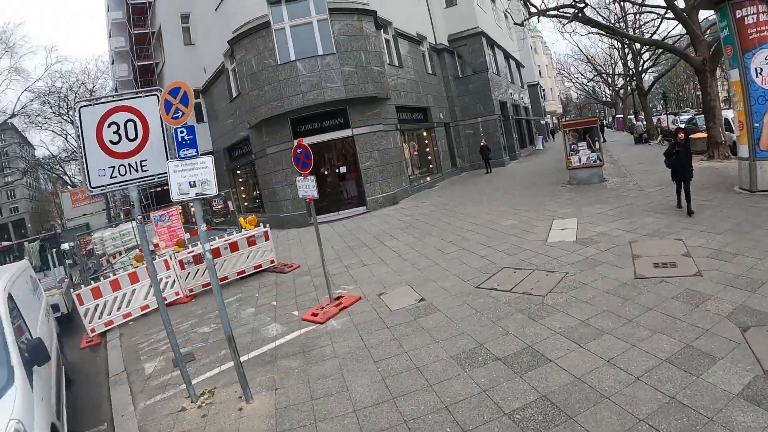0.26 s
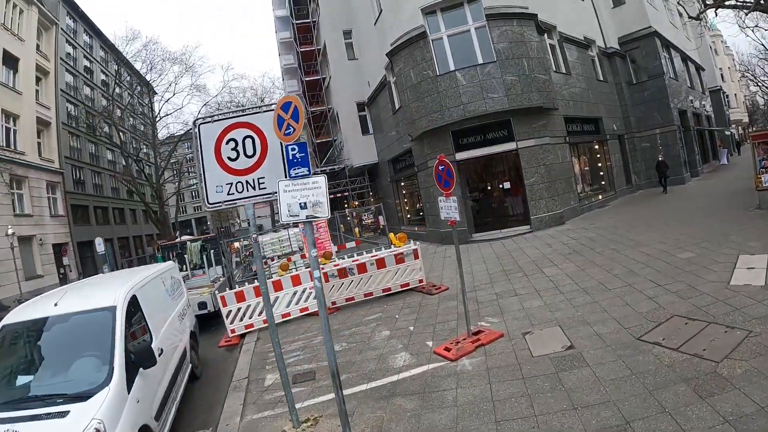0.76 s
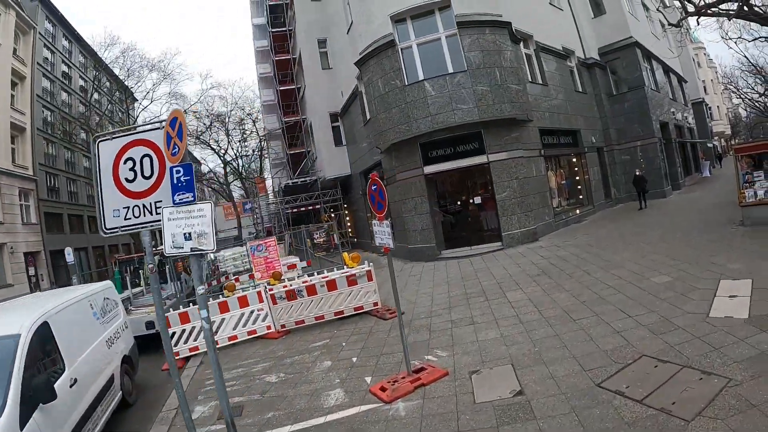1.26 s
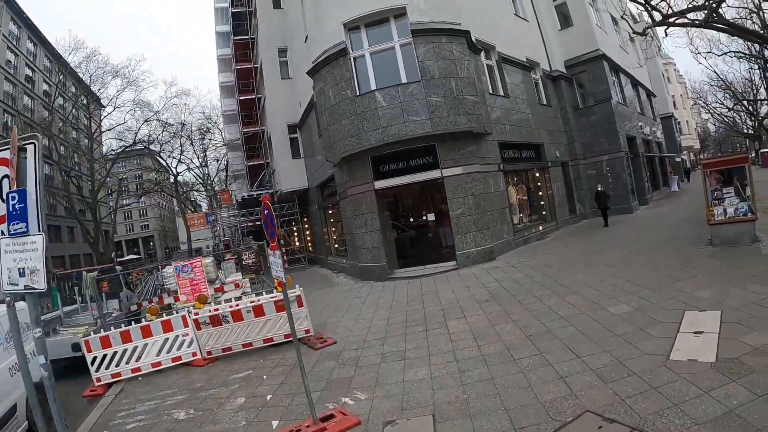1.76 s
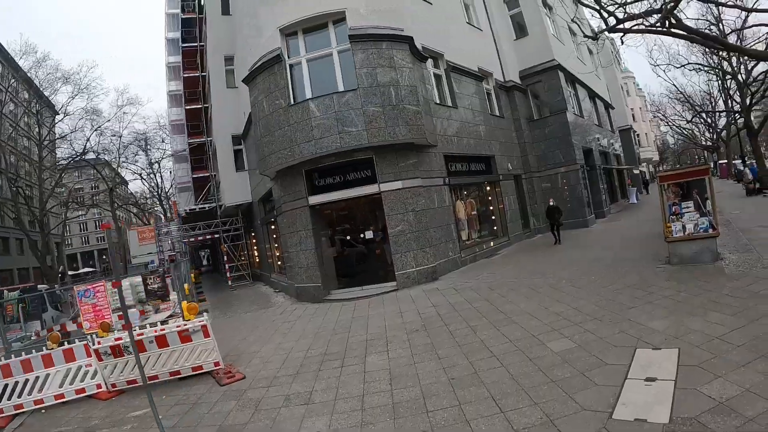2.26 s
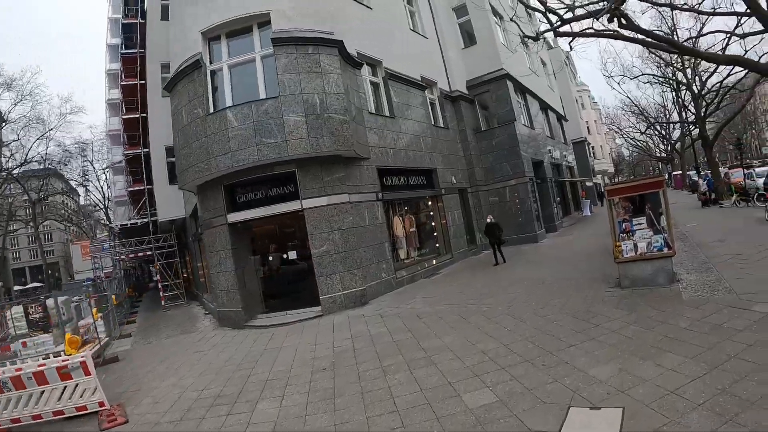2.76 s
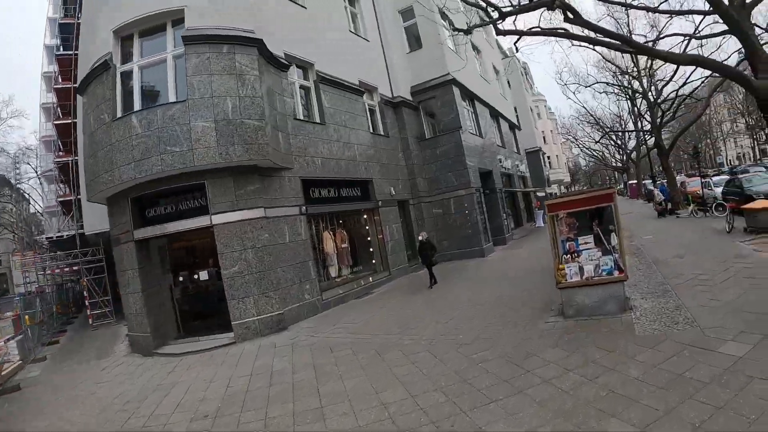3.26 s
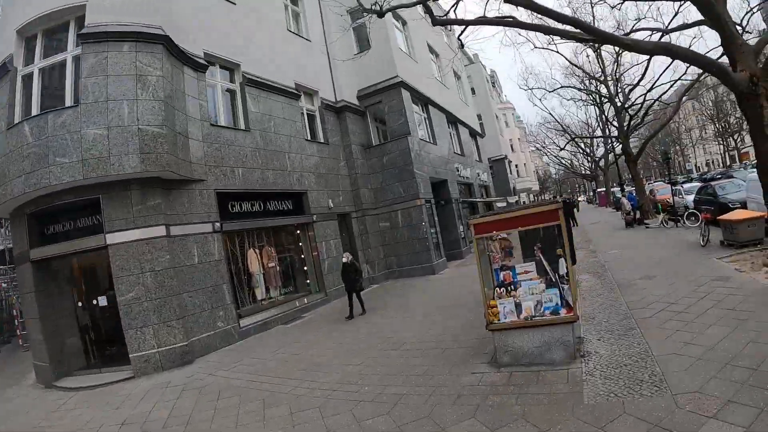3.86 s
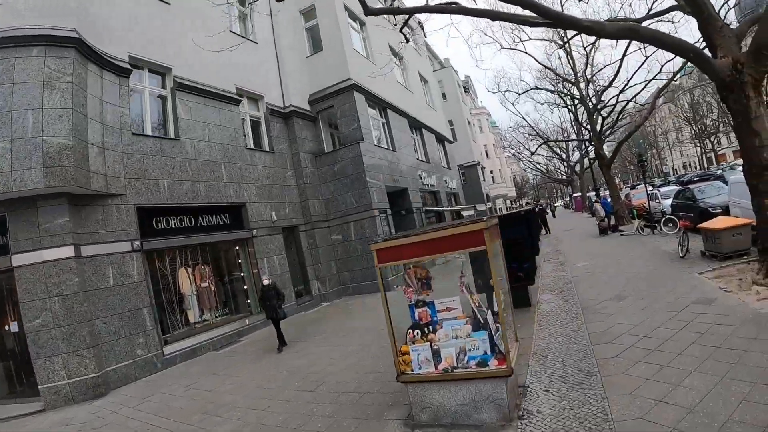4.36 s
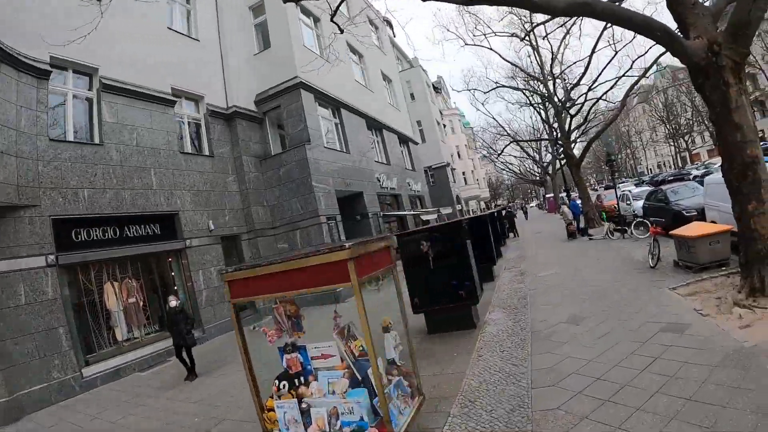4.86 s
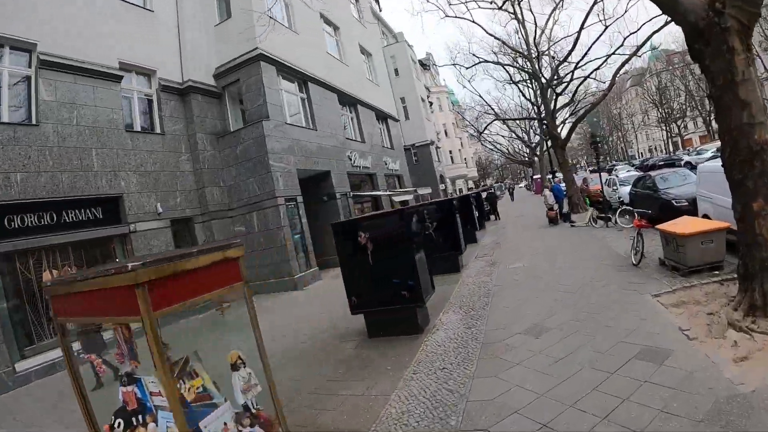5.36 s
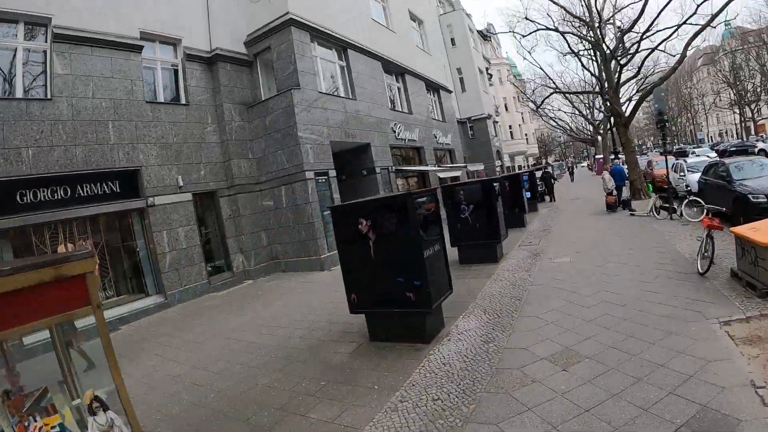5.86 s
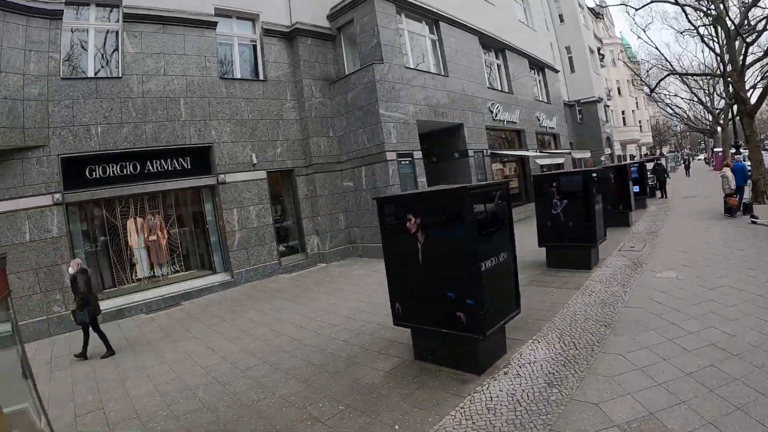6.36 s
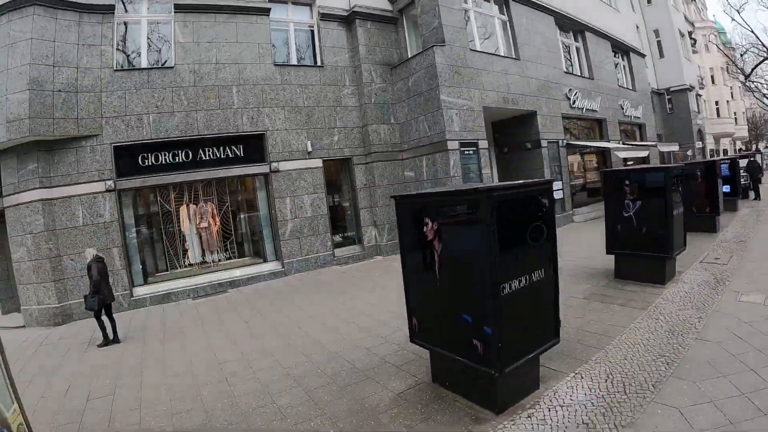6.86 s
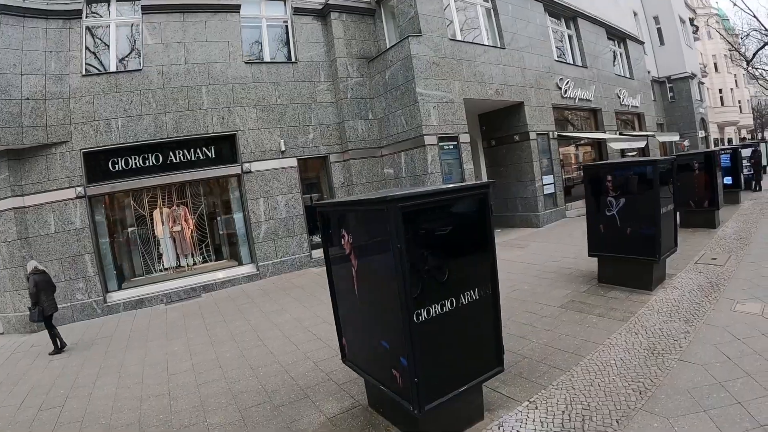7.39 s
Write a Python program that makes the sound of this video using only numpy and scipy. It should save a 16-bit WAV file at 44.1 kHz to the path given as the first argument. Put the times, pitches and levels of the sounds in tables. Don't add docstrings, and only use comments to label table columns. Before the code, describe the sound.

A continuous, bass-heavy city traffic rumble with muted tyre hiss fills the whole 7.6 seconds, gently swelling and flickering, with soft low thuds. At 0 s a heavy engine hums low and strong, its pitch climbing and its fundamental thinning until about 1.4 s, with faint turbo hiss and a tiny squeak near 0.1 s. It lifts off, falls in pitch and booms at 2.0-2.35 s, then vanishes by 2.5 s. From about 2.7 s thin, high metallic brake rubbing and squeal appear, first peaking near 3.1 s, with wavering whines; a tiny puff comes at 3.4 s. The brightest squeals come at 4.8-5.6 s, with a short air burst at 5.25 s. A softer brake rub follows from 5.9 s, fading to the end. Another engine swells near 5.5, 6.1 and 7.0-7.3 s, sinking in pitch among deep distant drones.

```python
import sys
import numpy as np
from scipy import signal
from scipy.fft import rfft, irfft, next_fast_len
from scipy.io import wavfile
from scipy.ndimage import uniform_filter1d

SR = 44100
rng = np.random.default_rng(int(sys.argv[2]) if len(sys.argv) > 2 else 0)


def master(y):
    cut = np.clip(np.atleast_2d(y).T, -1, 1)
    pcm = np.round(cut * 32767)
    wavfile.write(sys.argv[1], SR, pcm.astype(np.int16))


def attenuation_scalar(level_db):
    decades = np.asarray(level_db, float) / 20
    return 10 ** decades


N = 336482


def unit(x):
    return x / np.sqrt(np.mean(x ** 2))


def columns(table, fade_s=0.03):
    s, *cols = np.transpose(table)
    t = np.arange(N) / SR
    opening = np.clip((t - s[0]) / fade_s + (s[0] <= 0), 0, 1)
    closing = np.clip((s[-1] - t) / fade_s + 1, 0, 1)
    return opening * closing, [np.interp(t, s, c) for c in cols]


def walk(rate_hz):
    hold = max(int(SR / rate_hz), 1)
    held = np.repeat(rng.standard_normal(N // 500), hold)[:N]
    slewed = uniform_filter1d(np.resize(held, N), hold)
    return unit(uniform_filter1d(slewed, hold))


def tone(hz):
    return 2 * np.pi * np.cumsum(hz) / SR


def ring(hz, width_hz, steady, size):
    sounding = np.flatnonzero(size > 1e-9)
    live = slice(sounding[0], sounding[-1] + 1)
    sos = signal.butter(3, width_hz / 2, fs=SR, output="sos")
    noise = rng.spawn(1)[0].standard_normal((live.stop - live.start, 2)).T
    kick = unit(signal.sosfilt(sos, noise))
    share = np.clip(steady, 0, 1)
    phase = tone(np.broadcast_to(hz, N)[live])
    wander = np.sqrt(1 - share) * (kick[0] * np.cos(phase) + kick[1] * np.sin(phase))
    out = np.zeros(N)
    out[live] = size[live] * (np.sqrt(2 * share) * np.cos(phase) + wander)
    return out


def swell(start_s, loudest_s, end_s):
    power = 1.6
    since_s = np.arange(N) / SR - loudest_s
    rise_s, fall_s = max(loudest_s - start_s, .03), max(end_s - loudest_s, .03)
    up = (since_s > -rise_s) & (since_s < 0)
    down = (since_s >= 0) & (since_s < fall_s)
    out = np.zeros(N)
    out[up] = np.cos(np.pi / 2 * since_s[up] / rise_s) ** power
    out[down] = (1 - since_s[down] / fall_s) ** power
    return out, since_s


def slips(table, width_hz, steady, sag_hz_per_s=0, size=1, pointed=1):
    out = 0
    for start_s, loudest_s, end_s, db, hz in table:
        shape, since_s = swell(start_s, loudest_s, end_s)
        out = out + ring(hz - sag_hz_per_s * since_s, width_hz, steady, shape ** pointed * size * attenuation_scalar(db))
    return out


def engine(gate, hz, orders, levels_db, far=False):
    wobble = .002
    phase = tone(hz * (1 + wobble * walk(9))) + 2 * np.pi * rng.random()
    out = 0
    for k, db in zip(orders, levels_db):
        near_flutter_db = 1.5 if k > 1 else 1.2
        flutter_db = 2 if far else near_flutter_db
        out = out + attenuation_scalar(db + flutter_db * walk(7.7)) * np.sin(k * phase)
    return np.sqrt(2) * gate * out


def lorry():
    # time in seconds, firing rate in Hz, firing level in dB.
    firing = [
        (0, 79.4, -18),
        (.5, 84.6, -25.5),
        (.72, 86.15, -28),
        (1.38, 91.2, -30),
        (1.86, 81.07, -31.5),
        (2.0, 75.34, -20.5),
        (2.31, 64, -15.5),
        (2.37, 61.4, -24),
        (2.5, 56.7, -37),
    ]
    upper_orders_db = [-44.5, -46.5, -50]
    # start, loudest, end in seconds, level in dB, pitch in Hz.
    whistle = [
        (.45, .68, 1.2, -68, 8330),
        (.8, 1.28, 1.62, -65.5, 8400),
    ]
    # start, loudest, end in seconds, level in dB, pitch in Hz.
    belt = [
        (1.55, 1.95, 3.6, -74, 8100),
        (2.2, 2.75, 2.95, -76.5, 8000),
    ]
    pipe_hz, pipe_width_hz, pipe_db = 260, 20, 8.5
    pull_db = 1.5
    lift_off_s, lift_off_db = 1.42, -12
    hiss_db, hiss_scale_s, hiss_end_s, hiss_fade_s = -57.5, .55, 2.1, .2
    intake_db = -66

    t = np.arange(N) / SR
    closed = np.clip((t - lift_off_s) / 0.056, 0, 1)
    gate, (hz, firing_db) = columns(firing)
    levels_db = [firing_db]
    for k, db in zip(range(2, 5), upper_orders_db):
        resonance_db = pipe_db / (1 + ((k * hz - pipe_hz) / pipe_width_hz) ** 2)
        levels_db.append(db + resonance_db + pull_db + lift_off_db * closed)
    exhaust = engine(gate, hz, range(1, 5), levels_db)

    spool = np.clip(1.0 + .6 * t / hiss_scale_s, 0, 1) * np.clip(1 + (hiss_end_s - t) / hiss_fade_s, 0, 1)
    turbo = ring(4700., 2400, 0, spool * attenuation_scalar(hiss_db))
    throttle = np.clip(1 + (lift_off_s - t) / .5, 0, 1)
    intake = ring(7300., 2600, 0, throttle * attenuation_scalar(intake_db))
    return exhaust + turbo + intake + slips(whistle, 560, 0) + slips(belt, 350, 0)


def brakes(judder_db=1.5, throb_db=2.0):
    # time in seconds, level in dB.
    stops = [
        [(2.68, -90), (2.86, -62.5), (3.4, -59.5), (3.75, -60.5), (4.1, -65), (4.5, -59.5), (5.35, -57.5),
         (5.52, -69), (5.68, -89)],
        [(5.88, -89), (6.02, -64), (6.2, -62), (6.6, -66), (7.2, -66), (7.63, -73.5)],
    ]
    # pitch in Hz, level in dB re high mode, delay in seconds.
    wide_mode = [
        (7100, -5, .03),
        (7110, 1.5, .12),
    ]
    # pitch in Hz, width in Hz.
    modes = [
        (3550, 380),
        (8280, 170),
        (8300, 940),
        (10000, 400),
        (15650, 120),
    ]
    # start, loudest, end in seconds, level in dB, pitch in Hz.
    squeals = [
        (2.697, 3.069, 3.55, -56, 7500),
        (3.4, 3.68, 4.15, -65, 7520),
        (4.753, 4.92, 5.15, -64, 7602),
        (5.057, 5.25, 5.6, -53.5, 7525),
        (5.3, 5.468, 5.96, -59.5, 7500),
    ]
    chirp = [
        (4.75, 4.86, 4.95, -62, 7880),
        (4.9, 5.04, 5.24, -58, 7850),
    ]
    overtone = [
        (5.08, 5.19, 5.55, -72, 15090),
        (5.34, 5.4, 5.8, -64, 14980),
        (5.6, 5.71, 6.05, -61, 14870),
    ]
    lone_rub = [
        (-.3, .05, .8, -70, 7100),
        (3.55, 3.75, 5.1, -65, 7100),
        (6.35, 6.65, 7.1, -61, 7180),
        (6.85, 7.15, 6.8, -60, 7180),
    ]
    whines = [
        (3.45, 3.85, 4.1, -59.5, 4420),
        (4.05, 4.25, 4.6, -66, 4425),
        (4.7, 5.05, 5.65, -62, 4450),
        (6.1, 6.3, 6.6, -63, 4455),
        (6.15, 6.75, 7.55, -60, 4455),
    ]
    modes_db = [-0.5, 0, -7, -23, -45.5]
    scrub_hz, scrub_width_hz, scrub_db = 11600, 4500, -29
    squeal_rub_db = -6.5

    judder = attenuation_scalar(judder_db * walk(25))
    drift = 1 + .002 * walk(3)
    throb = attenuation_scalar(throb_db * walk(25))
    out = 0
    for stop, (wide_hz, wide_db, late_s) in zip(stops, wide_mode):
        gate, (high_db,) = columns(stop)
        rub = gate * judder * attenuation_scalar(high_db)
        late = np.pad(rub, (int(abs(late_s) * SR), 0))[:N]
        out = out + ring(wide_hz * drift, 330, 0, late * attenuation_scalar(wide_db))
        out = out + ring(scrub_hz, scrub_width_hz, 0, gate * attenuation_scalar(high_db + scrub_db))
        for (hz, width_hz), db in zip(modes, modes_db):
            out = out + ring(hz * drift, width_hz, 0.054, rub * attenuation_scalar(db))

    shaken = [(*row[:3], row[3] + squeal_rub_db, wide_mode[0][0]) for row in squeals]
    out = out + slips(squeals, 130, .35, 120, throb)
    out = out + slips(shaken, 330, 0, 0, judder)
    out = out + slips(chirp, 160, .1, 0, throb)
    out = out + slips(overtone, 200, .6, 700, throb ** 2, 2.5)
    out = out + slips(lone_rub, 350, 0)
    return out + slips(whines, 110, .25, 0, 0.94, 0.49)


def whoosh():
    # time in seconds, length in seconds, level in dB, low edge in Hz, high edge in Hz.
    puffs = [
        (0.128, .05, -53, 3480, 3580),
        (0.863, .12, -95, 14700, 15100),
        (2.082, 0.14, -67, 4740, 4900),
        (3.43, 0.016, -50, 2300, 2985),
        (5.243, .065, -38, 750, 1598),
        (5.244, 0.072, -52, 2970, 5420),
    ]
    t = np.arange(N) / SR
    out = 0
    for s, length_s, db, low_hz, high_hz in puffs:
        width_hz = high_hz - low_hz
        bell = np.exp(-((t - s) / length_s) ** 2)
        out = out + ring((low_hz + high_hz) / 2, width_hz, .5 * (width_hz < 300), attenuation_scalar(db) * bell)
    return out


def distant():
    # time in seconds, firing rate in Hz, firing level in dB.
    van = [
        (5.2, 80, -53),
        (5.52, 76.35, -28.5),
        (5.65, 74.43, -39.5),
        (6.13, 72.54, -21),
        (6.5, 67.96, -40.5),
        (7.0, 62.6, -25),
        (7.15, 63.4, -38),
        (7.26, 62.74, -24),
        (7.63, 55, -54),
    ]
    # start, loudest, end in seconds, level in dB, Hz at loudest, glide in Hz per s.
    drones = [
        (.5, .92, 1.4, -23, 48.3, 1.5),
        (2.62, 2.77, 2.92, -31, 55.4, 0),
        (1.6, 2.0, 2.15, -31, 119, 16),
        (2.22, 2.42, 2.95, -32, 116, -80),
        (6.0, 6.2, 6.5, -27, 35.5, -3),
        (6.45, 6.7, 7.1, -23, 33.8, -5),
        (5.95, 6.12, 6.4, -33, 104, -10),
        (6.75, 6.9, 7.05, -36, 127, -15),
        (7.2, 7.45, 7.7, -35, 128, -20),
    ]
    gate, (hz, db) = columns(van)
    out = engine(gate, hz, [1], [db])
    for start_s, loudest_s, end_s, db, hz, glide_hz_per_s in drones:
        shape, since_s = swell(start_s, loudest_s, end_s)
        out = out + engine(shape, hz + glide_hz_per_s * since_s, [1], [db], far=True)
    return out


def traffic(swell_db=.15, flicker_db=.6):
    layer_hz = [45, 200, 1200, 5500]
    layer_depth = [0.01, .3, .95, 1.5]
    # frequency in Hz, density in dB per Hz.
    street = np.array([(18, -3.5), (60, 0.5), (101, -6.5), (188, -16.5), (270, -16.5), (420, -22),
                       (1000, -25), (1800, -30.5), (2150, -35.5), (4600, -44), (6500, -55), (9000, -64),
                       (13800, -84.5), (15000, -100)])
    # time in seconds, level in dB.
    flow = [(0, -2), (.6, .5), (1.5, 1.5), (1.9, -2), (2.2, -2), (2.52, -4), (2.95, -1), (3.7, 1.5),
            (4.1, 1.5), (4.5, 2), (5.0, 2), (5.25, 2), (5.5, .5), (5.75, 0.3), (6.4, -1), (6.9, -.5),
            (7.63, 0)]
    # time, length in seconds, change in dB.
    surges = [(.27, .05, 0), (.7, 0.11, 1.5), (1.37, 0.075, -3), (1.59, 0.084, 6.5), (1.75, .12, 1),
              (2.09, .04, 4), (2.6, 0.13, 3), (2.85, .08, 0.5), (3.3, .05, 1), (3.387, .04, -11),
              (3.82, 0.13, 3), (4.22, 0.052, -13), (4.824, 0.027, 5), (5.103, 0.086, 2.5),
              (5.382, 0.043, 4), (5.642, 0.065, -2.5), (5.729, 0.052, 8), (6.194, 0.26, 5),
              (6.78, .12, 2.5), (7.082, .1, -2), (7.518, 0.11, 5.5)]
    # time, length in seconds, change in dB.
    growls = [
        (.85, 0.28, 1),
        (2.103, 0.16, 4),
        (2.747, 0.11, 1),
        (4.75, 0.54, -1.5),
        (5.356, 0.089, 2),
        (5.95, 0.19, 0.5),
        (6.4, 0.18, -1),
        (7.25, .45, 1),
    ]
    # time, length in seconds, change in dB.
    screens = [
        (2.1, 0.35, 2.5),
        (2.62, 0.14, -0.5),
        (3.3, 0.22, 1.5),
        (5.798, 0.34, -3.5),
        (6.9, .3, 0.5),
    ]
    street_db = -27

    t = np.arange(N) / SR
    _, (flow_db,) = columns(flow)
    change_db = [depth * flow_db for depth in layer_depth]
    for layer, events in zip([0, 1, -1], [surges, growls, screens]):
        for s, length_s, db in events:
            change_db[layer] = change_db[layer] + db * np.exp(-((t - s) / length_s) ** 2)

    size = next_fast_len(N)
    octave = np.log2(np.maximum(np.arange(size // 2 + 1) * SR / size, 1))
    colour = attenuation_scalar(np.interp(octave, np.log2(street[:, 0]), street[:, 1]))
    noise = rfft(rng.standard_normal(size)) * colour
    noise = noise / np.std(irfft(noise, size))

    out, shared = 0, walk(1.72)
    for centre in np.arange(4, 14.5, .5):
        window = np.cos(np.pi * np.clip(octave - centre, -.5, .5)) ** 2
        shares = [np.interp(centre, np.log2(layer_hz), row) for row in np.eye(len(layer_hz))]
        db = sum(share * change for share, change in zip(shares, change_db) if share > 0)
        band = irfft(noise * window, size)[:N]
        out = out + attenuation_scalar(db + swell_db * shared + flicker_db * walk(6.7)) * band
    return attenuation_scalar(street_db) * out


def scene():
    return (lorry() + distant() + traffic() + whoosh() + brakes())[None]


def low_pass(x):
    return signal.sosfilt(signal.butter(12, 15710, fs=SR, output="sos"), x)


def record(dry):
    ceiling = 0.53
    return low_pass(ceiling * np.tanh(dry / ceiling))


dry = scene()
out = record(dry)
master(out)
```